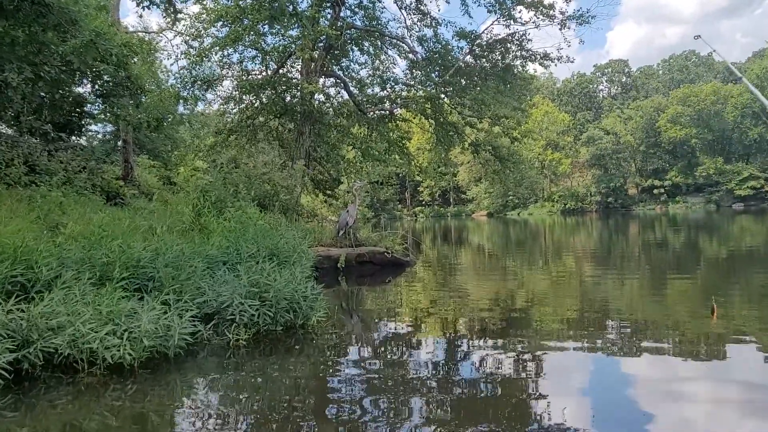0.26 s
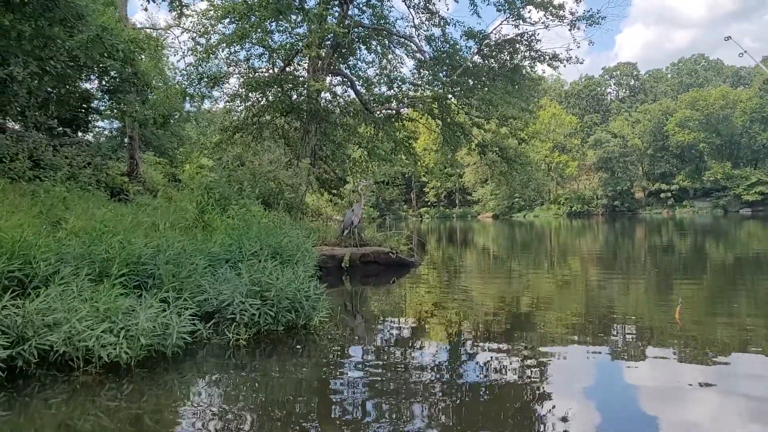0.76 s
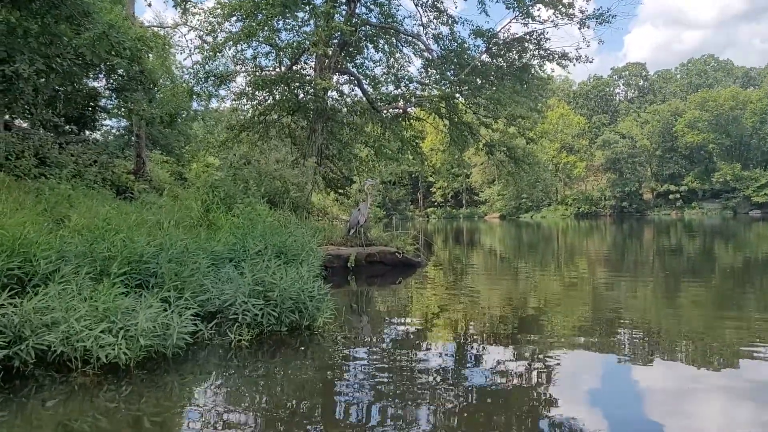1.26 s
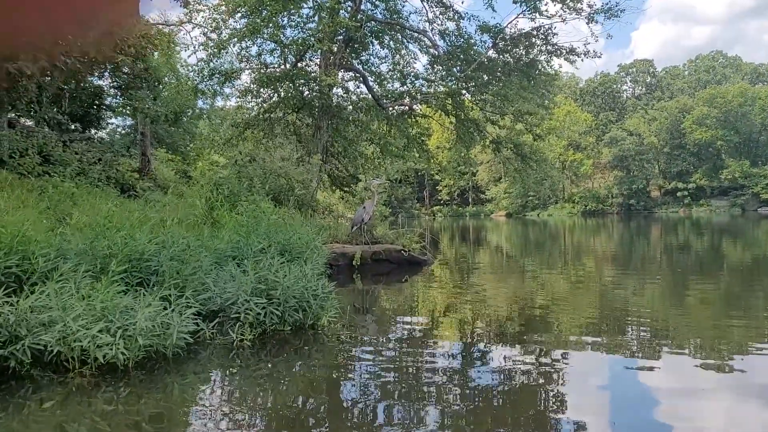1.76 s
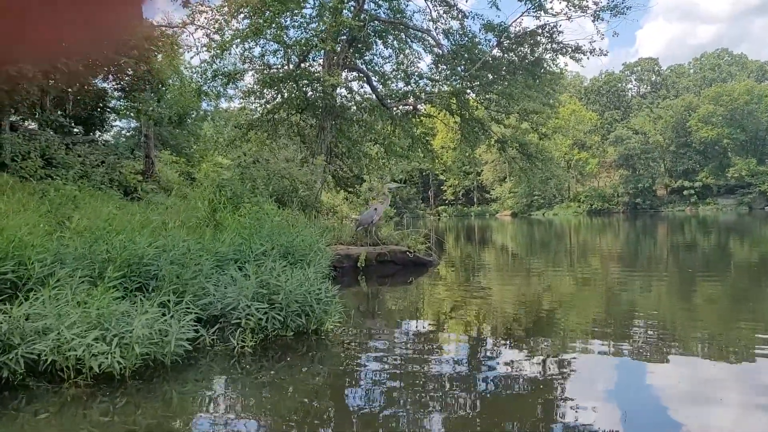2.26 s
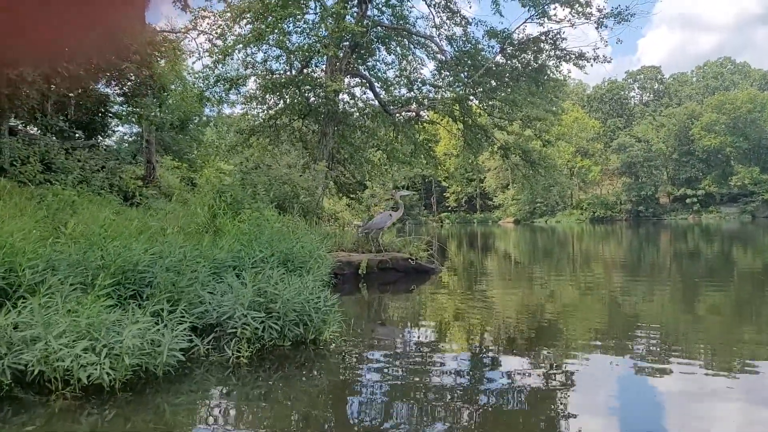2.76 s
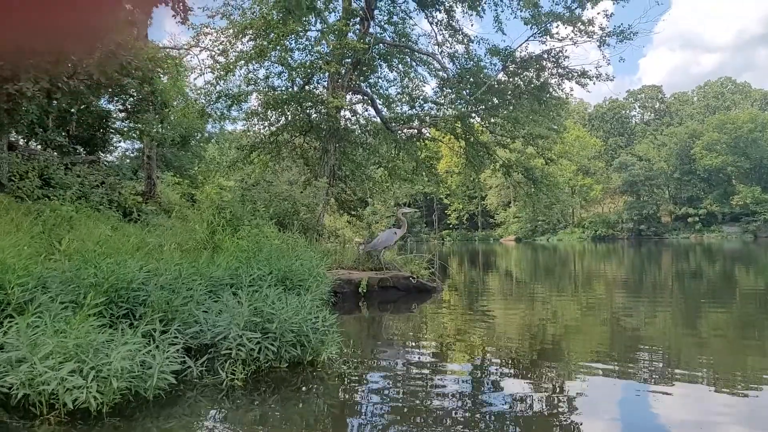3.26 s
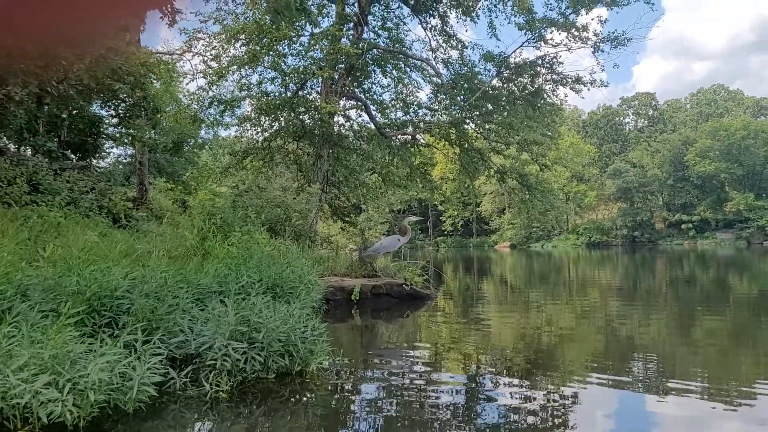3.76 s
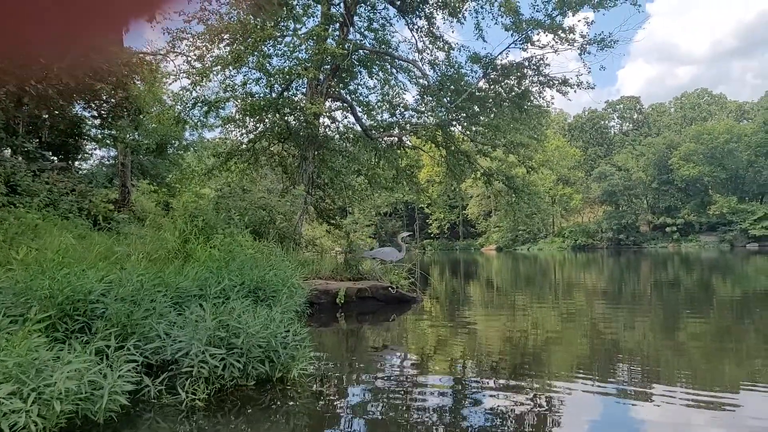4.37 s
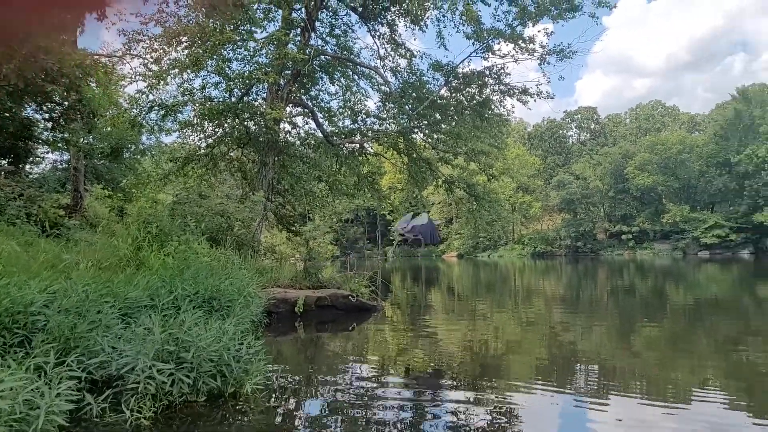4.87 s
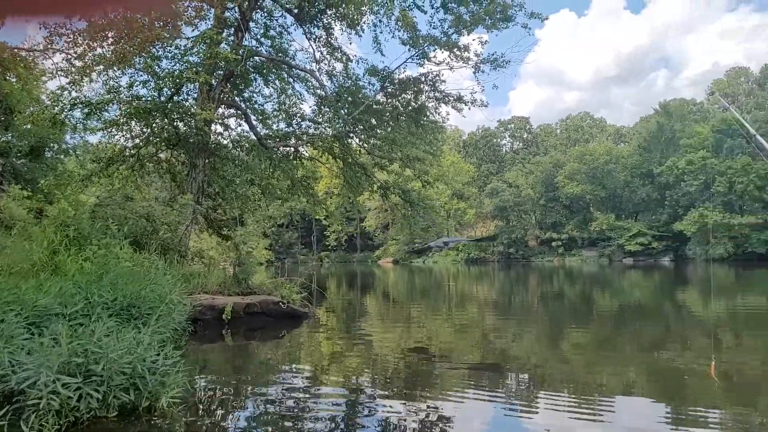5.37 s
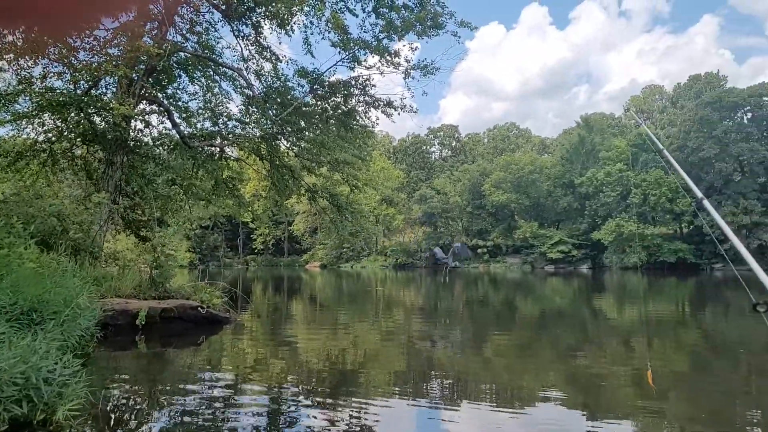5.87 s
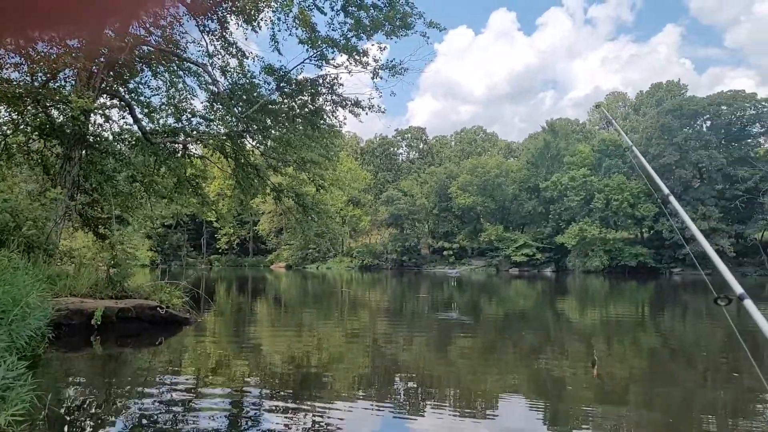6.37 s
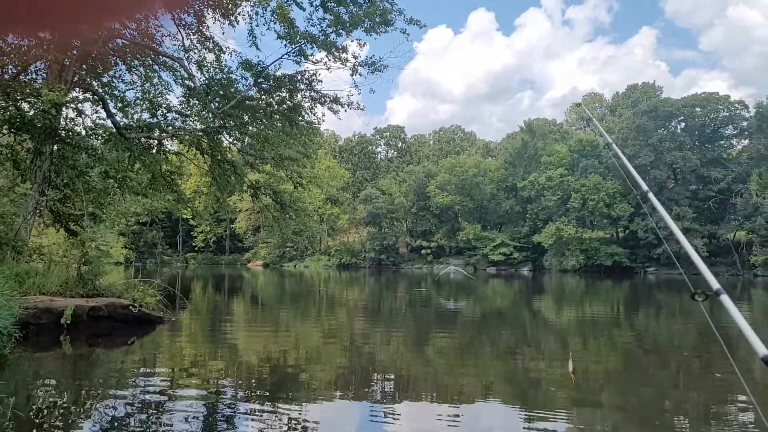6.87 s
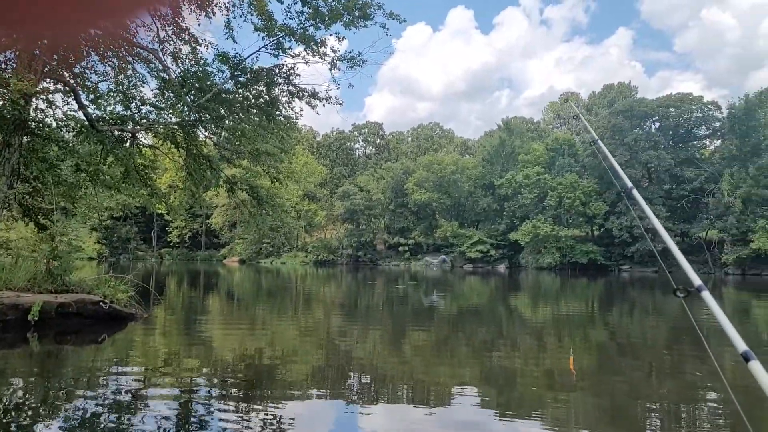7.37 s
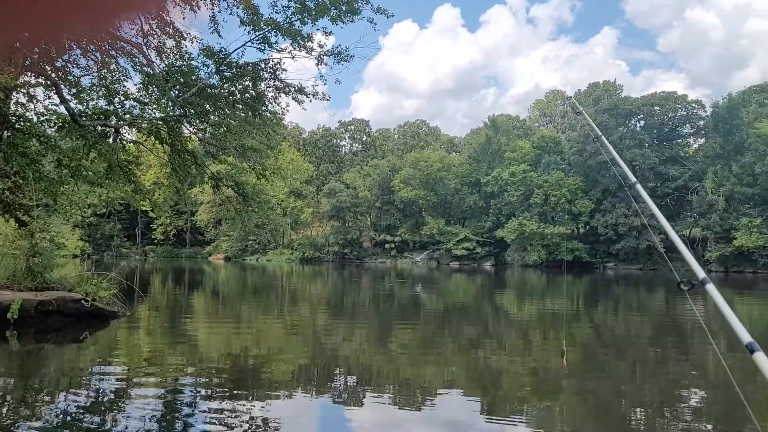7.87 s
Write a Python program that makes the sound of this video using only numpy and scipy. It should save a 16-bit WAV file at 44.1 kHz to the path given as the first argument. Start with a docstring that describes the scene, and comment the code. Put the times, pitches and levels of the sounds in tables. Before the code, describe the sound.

Summer lakeside: cicada buzz, faint bird chirps and small fishing-tackle ticks, low distant traffic, then a startled heron's rough croaks, the first one longest.

```python
"""A near cicada sings in syllables, then settles into a steady buzz over a far insect chorus.
A heron on the wooded summer lake shore gives five harsh, rattling croaks; bank and trees answer them.
A small bird chirps, fishing tackle ticks near the microphone, and traffic and engines rumble far off.
Tymbal clicks ring the cicada's abdomen, and slaps of the syrinx ring the heron's throat, bill and chest.
Chirps are gliding tones, ticks are short noise bursts, the distance is shaped noise and wavering tones."""
import sys
import numpy as np
from scipy import signal
from scipy.fft import rfft, irfft, next_fast_len
from scipy.io import wavfile
from scipy.ndimage import uniform_filter1d, map_coordinates

SR = 44100
rng = np.random.default_rng(int(sys.argv[2]) if len(sys.argv) > 2 else 0)


def inscribe(sig):
    """Save sig as 16-bit PCM at rate SR to the path in sys.argv[1].

    A 1-D sig is mono; a 2-D sig holds one channel per row.
    Samples are clipped to [-1, 1] before scaling.
    """
    pcm = np.round(np.clip(np.atleast_2d(sig).T, -1, 1) * 32767)
    wavfile.write(sys.argv[1], SR, pcm.astype(np.int16))


N = 358091

# The heron's croaks, the first a mere tick of voice; levels are before the resonances: start_s, length_s,
# level_db, crest (share of length), swell_db, slaps_per_s at rest, slaps_per_s at the crest, second_slap (0-1),
# chest_hz, rasp_db, chest_db
HERON_CROAKS = [(4.91, 0.019, -43, .5, 1.5, 92, 58, 0.25, 451, -16, -2),
                (5.08, 0.57, -28.8, .64, 6, 67, 75, 0.22, 505, -12.5, -17.5),
                (5.832, .18, -37.5, 0.63, 2.5, 47, 61.5, 0.55, 440, -19.5, -11.5),
                (6.188, .19, -38.5, 0.6, 5.5, 46, 86, 0.56, 421, -15.5, -11),
                (6.905, .36, -34.7, .38, 8, 55, 62, 0.37, 483, -10.5, -15),
                (7.832, .21, -30, 0.85, 14.5, 57, 90, 0.21, 480, -15.5, -30)]


def amp(db):
    """Decibels to amplitude."""
    return 10 ** (np.asarray(db) / 20)


def unit(x):
    """x at rms 1."""
    return x / np.sqrt(np.mean(x ** 2) + 1e-20)


def along(points, hz):
    """(Hz, value) points read on a log frequency axis."""
    f, v = np.transpose(points)
    return np.interp(np.log(hz + 1), np.log(f + 1), v)


def curves(rows):
    """One value per sample for each column after the time."""
    s, *cols = np.transpose(rows)
    return [np.interp(np.arange(N) / SR, s, c) for c in cols]


def wobble(rate):
    """A smooth random curve, rate knots a second."""
    coarse = np.linspace(0, N, N // 16)
    knots = rng.standard_normal(int(N * rate / SR) + 4)
    return np.interp(np.arange(N), coarse, map_coordinates(knots, [coarse * rate / SR]))


def gate(s, length, attack, release):
    """1 for length seconds from s, with a ramp before and after."""
    return np.interp(np.arange(N) / SR, [s - attack, s, s + length, s + length + release], [0, 1, 1, 0])


def filtered(x, response):
    """x times a response of frequency."""
    m = next_fast_len(N + SR // 2)
    return irfft(rfft(x, m) * response(np.fft.rfftfreq(m, 1 / SR)), m)[..., :N]


def resonate(x, hz, width_hz, order=2):
    """A resonance of cascaded stages, each width_hz wide, whose centre may move; flat noise keeps its power."""
    turn = np.exp(2j * np.pi * np.cumsum(hz * np.ones(N)) / SR)
    pole = np.exp(-np.pi * width_hz / SR)
    ring = x / turn  # the centre shifted down to 0 Hz
    for stage in range(order):
        ring = signal.lfilter([1 - pole], [1, -pole], ring)
    kept = (1 - pole) * np.prod([1 - .5 / k for k in range(1, order)]) / 4
    return (ring * turn).real / np.sqrt(kept)


def pulses(rate, jitter, scatter_db):
    """Times (samples) and sizes of pulses at a changing rate; jitter is a share of the cycle."""
    cycles = np.cumsum(rate) / SR
    count = np.arange(int(cycles[-1]) + 1)
    chance = rng.standard_normal((N // 64, 2))[:len(count)]
    at = np.interp(count + jitter * chance[:, 0], cycles, np.arange(len(rate)))
    return at, amp(scatter_db * chance[:, 1])


def train(at, size):
    """Impulses placed between samples by a windowed sinc."""
    taps = at.astype(int)[:, None] + np.arange(-7, 9)
    off = taps - at[:, None]
    shape = np.sinc(off) * np.cos(np.pi * off / 16) ** 2
    return np.bincount(np.clip(taps, 0, N - 1).ravel(), (size[:, None] * shape).ravel(), N)


def puffs(clicks, life):
    """A burst of noise after each click, its energy set by the click, dying in life seconds."""
    pole = np.exp(-2 / (life * SR))
    energy = signal.lfilter([1 - pole], [1, -pole], clicks ** 2)
    return np.sqrt(energy) * rng.standard_normal(N)


def place(x, pan_db):
    """Left louder than right by pan_db."""
    return x * amp(np.reshape([pan_db / 2, -pan_db / 2], (2, -1)))


def add(track, s, sound):
    """Mix a sound in from time s."""
    part = track[..., round(s * SR):][..., :sound.shape[-1]]
    part += sound[..., :part.shape[-1]]


def rush(spectrum, patchy_db):
    """Stereo noise of rms 1 with patches of random gain."""
    # Likeness of left and right: freq_hz, likeness (0-1)
    likeness = [(30, 0.75), (120, 1), (300, 0.28), (1000, 0), (4000, 0), (15000, 0)]
    z = signal.stft(rng.standard_normal((2, N)), nperseg=512)[2]
    field = uniform_filter1d(rng.standard_normal(z.shape[1:]), size=6, axis=0)
    field = uniform_filter1d(field, size=14, axis=1)
    pair = signal.istft(z * amp(patchy_db * unit(field)), nperseg=512)[1][:, :N]
    turn = lambda hz: np.arccos(np.clip(along(likeness, hz), -1, 1)) / 2
    mid, side = filtered(pair, lambda hz: amp(along(spectrum, hz)) * [np.cos(turn(hz)), np.sin(turn(hz))])
    return unit(np.array([mid + side, mid - side]))


def cicada(stagger=0.03, rib_life=0.0047, rough_early=0.7, rough_settled=0.8, loose_life=0.0019,
           leaves_db=-2, ear_lag=0.000347, direct=0.39):
    """Two tymbals buckle in turn; each buckling is a quick run of rib clicks that rings the abdomen."""
    # Relative resonance of the abdomen when clicking fast: freq_hz, level_db
    fast_body = [(2500, -52), (3400, -23.5), (4000, -8), (4700, -16), (5050, -7), (5400, -33), (5900, -18),
                 (7200, -34), (8400, -14), (9500, -7), (10600, -15), (11600, -8.5), (12700, 3.5),
                 (13600, 1), (14400, -10), (15000, -13), (15700, -19)]
    # Relative resonance of the abdomen in the steady buzz: freq_hz, level_db
    settled_body = [(2500, -38.5), (3400, -30.5), (4000, -19.5), (4600, -12), (4950, -22), (5300, -24),
                    (5900, -32), (7200, -30.5), (8400, -11.5), (9200, -11.5), (10400, -25.5), (11300, -11),
                    (12400, -0.5), (13100, -1.5), (14100, -16), (15700, -14.5)]
    # Place in the stereo picture: time_s, left_over_right_db
    pan_track = [(0.0, 0.5), (0.16, 1.5), (1.79, 1), (2.03, 6.5), (8.12, 8)]
    level_db, rate, lift_hz, settled = song_controls()
    pan_db, = curves(pan_track)
    taut = np.clip((rate - 305) / 30, 0, 1)  # faster clicking shifts the abdomen towards its fast resonances
    rate = rate * (1 + 0.001015 * wobble(9))
    at, size = pulses(rate, jitter=0.0021, scatter_db=1)
    at[::2] += stagger * SR / rate.mean()  # uneven turns give lines at half the click rate
    sides = [train(at[k::2], size[k::2]) for k in range(2)]

    # three paths: the direct one, and one through the foliage to each ear
    t = np.arange(SR // 100) / SR
    ribs = lambda: rng.standard_normal((3, len(t))) * np.exp(-t / rib_life)
    clean = unit(sum(signal.fftconvolve(side[None], ribs(), axes=1)[:, :N] for side in sides))
    loose = np.array([unit(puffs(sum(sides), loose_life)) for path in range(3)])
    loose = unit(loose + amp(leaves_db) * rng.standard_normal((3, N)))  # leaves scatter sound into the gaps
    # the loose part is slightly weaker around 9 kHz
    loose = filtered(loose, lambda hz: amp(along([(5500, -1.0), (9000, -1.8), (12000, -0.38)], hz)))
    rough = np.clip(rough_early + (rough_settled - rough_early) * settled, 0, 1)
    paths = np.sqrt(1 - rough) * clean + np.sqrt(rough) * loose
    lagged = filtered(paths[0], lambda hz: np.exp(-2j * np.pi * hz * ear_lag))
    straight = np.array([paths[0], lagged])
    drive = unit(direct * straight + (1 - direct) * paths[1:])

    song = taut * abdomen(drive, fast_body, lift_hz) + (1 - taut) * abdomen(drive, settled_body, lift_hz)
    song = song + partials(rate, settled)
    return place(amp(level_db + 1.53) * song, pan_db)


def song_controls():
    """Each syllable tenses the tymbal muscles: louder, faster and higher; the rate sinks as the song settles."""
    # Syllables, the last three being the steady buzz; level before the final trim:
    # start_s, length_s, level_db, resonance_lift_hz
    syllables = [(0.129, 0.11, -34, 250), (0.511, 0.27, -34, 246), (.91, .2, -33, 200),
                 (1.14, .25, -32.5, 152), (1.509, .06, -30.5, 50), (1.741, 0.23, -33, 0),
                 (2.137, .26, -35.5, 150), (2.579, .1, -36, -50), (2.741, .05, -36, 350),
                 (2.966, .03, -34, -300), (3.086, 0.071, -34, 200), (3.29, .065, -32, 100),
                 (3.497, .03, -32.5, 100), (3.62, .12, -31.5, 200), (3.854, .025, -34.5, 0),
                 (3.991, .14, -30.5, 250), (4.254, .025, -33, 100), (4.395, 0.22, -31.5, 200),
                 (4.748, 0.028, -33, 100), (4.972, 1.78, -31, 52), (6.18, .17, -29.5, 50),
                 (6.838, 1.28, -32, -2)]
    # Click rate under full effort, slowing as the song settles: time_s, clicks_per_s
    click_rate = [(.1, 340), (.5, 333), (.9, 330), (1.5, 327), (2.3, 325), (3, 317), (3.6, 316),
                  (3.75, 308), (4, 312), (4.12, 305), (4.38, 310), (4.47, 305), (4.95, 306.5), (5.12, 302),
                  (5.4, 304.5), (5.55, 301.5), (6.3, 306.4), (6.75, 306.6), (7.15, 305.2), (7.35, 307.2),
                  (7.9, 305.2), (8.12, 306)]
    attack_s, release_s = .055, .1  # muscles tense before a syllable and slacken after it
    idle_db = -42  # the buzz that goes on between syllables, before the final trim
    slack_clicks_per_s, slack_drop_hz = 8, 200  # click rate and resonance lost when slack
    settle_s, unsteady_db, drift_hz = 4.97, .9, 130  # time to settle; random spread of level and resonance
    gates = np.array([gate(row[0], row[1], attack_s, release_s) for row in syllables])
    s, length, db, lift_hz = np.transpose(syllables)
    effort = gates.max(axis=0)
    progress = np.clip(np.arange(N) / SR / settle_s, 0, 1)
    level_db = idle_db + np.max(gates * (db - idle_db)[:, None], axis=0)
    level_db = level_db + unsteady_db * (1 - progress / 2) * wobble(14)
    lift_hz = lift_hz @ gates - slack_drop_hz * (1 - effort) + drift_hz * wobble(12)
    rate = curves(click_rate)[0] - slack_clicks_per_s * (1 - effort)
    return level_db, rate, lift_hz, progress ** 2


def abdomen(drive, spectrum, lift_hz):
    """The cicada's resonances, all stretched in pitch as the main one is lifted."""
    main_hz = 12700
    hz, t, z = signal.stft(drive, SR, nperseg=512)
    stretch = 1 + np.interp(t * SR, np.arange(N), lift_hz) / main_hz
    ringing = z * amp(along(spectrum, hz[:, None] / stretch))
    return unit(signal.istft(ringing, SR, nperseg=512)[1][:, :N])


def partials(rate, settled):
    """Tones at multiples of one tymbal's rate; the high ones grow in as the song settles."""
    # Turn-taking of the tymbals, from even (0) to limping (1): time_s, limp_share
    limp_track = [(.7, 0.015), (.85, 0.86), (6.78, 0.99), (6.86, 0)]
    # Relative resonance over the low partials: freq_hz, level_db
    low_body = [(3600, -42), (3990, -27), (4140, -29), (4440, -21.5), (4600, -22.5), (4750, -18),
                (4900, -30), (5050, -34), (5210, -26.5), (5330, -30), (5500, -41), (5650, -34), (5900, -46)]
    # High partials, relative level: multiple of one tymbal's rate, limping_db, even_turns_db
    high_partials = [(54, -28, -34), (55, -38, -25), (56, -28, -29), (58, -26, -29), (60, -22, -31),
                     (75, -27, -19), (77, -18, -20), (78, -21, -13), (79, -20, -24), (81, -8, -13),
                     (82, -22, -14), (83, -13, -24), (84, -20, -13), (86, -20, -21), (87, -21, -20),
                     (94, -23, -31)]
    weak_partial_db = -12.5  # limping favours odd multiples, even turns favour even ones
    flutter, blur_per_partial = .006, .009  # phase spread per multiple (radians): tymbals, moving leaves
    ear_wander = .6  # slow phase spread at each ear, opposite ways (radians)
    shimmer_db = 2.8  # slow drift of each partial
    early_ring_db = -7  # the low partials are weaker before the song settles
    limp = np.clip(curves(limp_track)[0], 0, 1)
    phase = np.pi * np.cumsum(rate) / SR  # one tymbal clicks at half the rate

    def tone(k, db):
        """One partial with unsteady level and phase."""
        blur = k * (flutter * wobble(25) + blur_per_partial * wobble(110))
        ears = ear_wander * wobble(4) * np.array([[1], [-1]])
        return amp(db + shimmer_db * wobble(5)) * np.sqrt(2) * np.sin(k * phase + blur + ears)

    weak = lambda k: 1 - limp if k % 2 else limp
    low = sum(tone(k, along(low_body, k * rate / 2) + weak_partial_db * weak(k)) for k in range(26, 38))
    high = sum(tone(k, even + (limping - even) * limp) for k, limping, even in high_partials)
    return amp(1 + early_ring_db * (1 - settled ** 2)) * low + settled ** 6 * high


def cicada_whine():
    """A narrow, high whine of the near cicada, as ringing noise, swells and fades early on."""
    # The whine: time_s, level_db
    whine_level = [(0, -62), (.15, -50), (.4, -62), (1.0, -46), (1.5, -55), (2.25, -50), (2.7, -64),
                   (3.2, -90)]
    return amp(curves(whine_level)[0]) * resonate(rng.standard_normal((2, N)), 4755, 46)


def heron(puff_life=0.012, rasp_life=0.0087, throat_width_hz=380, skirt_width_hz=900, skirt_db=2,
          rasp_slap_db=-4):
    """Slow slaps of the syrinx ring throat, bill and chest; pushed hard they break up into a rasp."""
    # Bill, then lower and upper rasp resonance: centre_hz, width_hz of each stage
    bill_and_rasps = [(1560, 200), (2200, 820), (2830, 580)]
    # The throat resonance moves and the bill rings as it opens: time_s, throat_hz, bill_db
    throat_track = [(4.93, 680, -18), (5.08, 773, -27), (5.36, 820, -31), (5.46, 852, -25),
                    (5.52, 890, -15), (5.64, 890, -16), (5.85, 830, -21), (5.98, 870, -16.5),
                    (6.2, 820, -22), (6.35, 860, -23), (6.92, 806, -11.5), (7.1, 848, -12),
                    (7.25, 808, -14.5), (7.85, 818, -16), (7.915, 896, -16), (7.943, 1078, -5),
                    (7.975, 1220, -4.5), (8.008, 1230, -4), (8.024, 890, -8), (8.04, 735, -5)]
    clean_air = .07  # share of air in a clean slap
    chest_width_hz = 210
    rasp_floor_db = -14  # the upper rasp is all but shut in a soft croak
    sounding, level_db, chest_hz, rasp_db, chest_db, rate, rough = croak_controls()
    throat_hz, bill_db = curves(throat_track)
    slaps = syrinx(rate)

    def air(life):
        """Puffs after the slaps, giving way to a steady rush when hoarse."""
        return np.sqrt(1 - rough) * puffs(slaps, life) + np.sqrt(rough) * sounding * rng.standard_normal(N)

    share = clean_air + (1 - clean_air) * rough
    drive = np.sqrt(1 - share) * slaps + np.sqrt(share) * air(puff_life)
    bill, low_rasp, high_rasp = bill_and_rasps
    # an open bill widens the throat resonance
    skirt = amp(np.minimum(bill_db + skirt_db, -10)) * resonate(air(puff_life), throat_hz, skirt_width_hz)
    throat = resonate(drive, throat_hz, throat_width_hz, order=4) + skirt
    throat_tone = [(400, -6.5), (620, -9), (720, 0.0), (1000, -1.5), (1650, 1), (1900, 0)]
    throat = filtered(throat, lambda hz: amp(along(throat_tone, hz)))
    beak = amp(bill_db) * resonate(drive, *bill, order=3)
    boom = amp(chest_db) * resonate(drive, chest_hz, chest_width_hz)

    # the rasp brightens as it grows louder
    bright_db = np.clip(0.9 * (level_db + rasp_db + 41), rasp_floor_db, 0)
    scratch = lambda: air(rasp_life) + amp(rasp_slap_db) * np.sqrt(1 - rough) * slaps
    rasp = resonate(scratch(), *low_rasp) + amp(bright_db) * resonate(scratch(), *high_rasp)
    rasp_tone = [(1350, -11), (1750, 0.5), (2400, 1.5), (3100, 2.5), (3700, 3)]
    rasp = filtered(rasp, lambda hz: amp(along(rasp_tone, hz)))
    return amp(level_db) * (place(throat + beak + boom, 3.5) + place(amp(rasp_db - 0.7) * rasp, -.3))


def croak_controls():
    """Effort rises to a crest and falls in each croak, making it louder and faster."""
    # The first three full croaks crack when pushed: time_s, hoarseness (0-1)
    cracks = [(5.08, 0.4), (5.14, 0.43), (5.2, 0.76), (5.28, 0.97), (5.335, 0.68), (5.39, 0.28),
              (5.46, 0.25), (5.52, 0.3), (5.585, 0.55), (5.62, 0.2), (5.92, .1), (5.945, 0.4), (5.97, .1),
              (6.25, 0.09), (6.29, .5), (6.34, 0.3), (6.38, 0)]
    edge_s = .005  # onset and cut-off of a croak's air
    onset_s, onset_db = 0.027, 5  # a croak takes a moment to catch, and starts this much weaker
    fade = 2.2  # effort lost per croak length after the crest
    loss_db, crack_rasp_db, crack_chest_db = 5.5, 15, 17  # hoarseness costs voice, adds rasp and chest
    rasp_sag_db = 4  # rasp lost at no effort
    clean_rough = .03  # roughness of an unbroken croak (0-1)
    t = np.arange(N) / SR
    starts = np.array(HERON_CROAKS)[:, 0]
    latest = np.maximum(np.searchsorted(starts - edge_s, t) - 1, 0)
    rows = np.array(HERON_CROAKS)[latest].T
    s, length, db, crest, swell_db, slow, fast, second_slap, chest_hz, rasp_db, chest_db = rows
    u, crest = (t - s) / length, np.clip(crest, .05, .95)
    effort = np.clip(np.minimum(u / crest, 1 - fade * (u - crest)), 0, 1)
    sounding = sum(gate(row[0], row[1], edge_s, edge_s) for row in HERON_CROAKS)
    hoarse = np.clip(np.interp(t, *np.transpose(cracks), left=0, right=0), 0, 1)
    catching = np.clip(1 - (t - s) / onset_s, 0, 1)
    level_db = db - swell_db * (1 - effort) - onset_db * catching - loss_db * hoarse
    rasp_db = rasp_db + crack_rasp_db * hoarse ** 2 - rasp_sag_db * (1 - effort) ** 2
    chest_db = chest_db + crack_chest_db * hoarse
    rate = slow + (fast - slow) * effort
    rough = clean_rough + (1 - clean_rough) * hoarse ** 2
    return sounding, level_db, chest_hz, rasp_db, chest_db, rate, rough


def syrinx(rate):
    """A nearly even run of slaps from the start of each croak, each followed by a weaker second slap."""
    second_delay_s = 0.00478  # mean delay of the second slap
    slaps = np.zeros(N)
    for s, length, db, crest, swell_db, slow, fast, second_slap, *colour in HERON_CROAKS:
        start = round(s * SR)
        at, size = pulses(rate[start:start + round(length * SR)], jitter=.05, scatter_db=1.7)
        late = second_delay_s * SR * rng.uniform(.75, 1.25, size=128)[:len(at)]
        pair = train(start + at, size) + train(start + at + late, second_slap * size)
        slaps += pair / np.hypot(1, second_slap)
    return slaps * np.sqrt(SR / rate)  # equal power at any rate


def small_bird():
    """Short gliding notes with a rough burr."""
    # Notes, level before trims: start_s, length_s, start_hz, end_hz, level_db
    notes = [(1.377, 0.064, 1940, 2420, -69), (2.427, 0.074, 2003, 2320, -63),
             (3.252, 0.023, 2160, 1810, -53), (3.463, 0.026, 2650, 2790, -58),
             (3.555, 0.052, 2680, 3080, -51.5), (3.855, .03, 2740, 2904, -60),
             (4.169, 0.034, 2777, 2940, -50), (4.629, 0.042, 2830, 2935, -54.5),
             (4.722, 0.058, 2600, 3060, -51.5), (5.792, 0.035, 2880, 2995, -55.5),
             (6.125, 0.042, 2150, 2643, -60), (6.53, .045, 3160, 2950, -61),
             (6.765, 0.049, 3107, 2820, -58), (6.813, 0.067, 2028, 2652, -59),
             (7.261, 0.051, 2100, 2440, -58), (7.779, 0.041, 2270, 2420, -51)]
    burr_share, flutter_db = .024, 3.5  # random spread of pitch (share) and level
    out, burr, flutter = np.zeros(N), wobble(420), wobble(260)
    for s, length, start_hz, end_hz, db in notes:
        u = np.linspace(0, 1, int(length * SR))
        glide_hz = start_hz + (end_hz - start_hz) * u
        hz = glide_hz * (1 + burr_share * burr[round(s * SR):][:len(u)])
        add(out, s, amp(db + 6.5) * np.sin(np.pi * u) * np.sin(2 * np.pi * np.cumsum(hz) / SR))
    return place(out * amp(flutter_db * flutter), 2.2)


def tackle(life=0.0085, snap_life=0.0014):
    """Each tick is a brief scrape with a ring, knock and snap; the one at 2.913 s is nearly all broadband snap."""
    # Ticks (at 2.913 s a bare snap, not tackle), level before trims, knock and snap relative to it:
    # start_s, level_db, low_knock_db, bright_snap_db
    ticks = [(0.099, -35, -19, -13), (0.146, -44.5, -2, -16), (1.8215, -38.5, -1.5, -15),
             (1.848, -40.5, -6, -9), (2.487, -39, -5, -11), (2.5195, -25.5, -33, -24),
             (2.592, -29, -10, -22), (2.913, -42, -20, 6.5), (3.2797, -28, -18, -10),
             (3.301, -28.5, -19, -13), (3.315, -32, -26, -6), (3.961, -28.5, -36, -11),
             (4.0042, -26, -18, -22), (4.0485, -28, -13, -22), (4.0593, -24, -13, -19),
             (4.0746, -27, -25, -29), (4.142, -37.5, -3, -8), (4.1582, -32, -12, -20), (4.318, -48, 1, -3),
             (6.2037, -30, -11, -8), (7.7365, -32, -11, -14), (7.76, -30, -3.5, -9), (7.9127, -37, 3, -24)]
    # Resonances of the ring: centre_hz, width_hz of each stage, level_db
    ring_modes = [(1290, 280, -14.5), (1740, 230, -14), (2720, 470, -0.5), (3230, 290, 1)]
    rub, knock, snap = np.zeros((3, N))
    t = np.arange(SR // 10) / SR
    scrape = lambda life: rng.standard_normal(len(t)) * np.exp(-t / life)
    for s, db, knock_db, snap_db in ticks:
        add(rub, s, amp(db - 17.0) * scrape(life))
        add(knock, s, amp(db + knock_db - 2.5) * scrape(life))
        add(snap, s, amp(db + snap_db + 4.5) * scrape(snap_life))
    ring = sum(amp(db) * resonate(rub, hz, width) for hz, width, db in ring_modes)
    knock_tone = [(150, -17), (400, -2.5), (1500, 4.5), (3500, -1), (6000, -24)]
    snap_tone = [(1000, -16), (3000, -1.0), (8000, 4.0), (15000, 2)]
    low = filtered(knock, lambda hz: amp(along(knock_tone, hz)))
    high = filtered(snap, lambda hz: amp(along(snap_tone, hz)))
    return place(ring + low + high, 5.0)


def shore(x, decay):
    """A diffuse answer, different at each ear, each frequency dying at its own rate."""
    hz, t, z = signal.stft(rng.standard_normal((2, SR)), SR, nperseg=256)
    dying = z * amp(-60 * t / along(decay, hz)[:, None])
    tail = signal.istft(dying, SR, nperseg=256)[1]
    return signal.fftconvolve(x, tail / np.linalg.norm(tail[0]), axes=1)[:, :N]


def background():
    """Far insects in the trees, and a road, engines and machinery beyond: shaped noise and wavering tones."""
    # Relative spectrum of the insect chorus: freq_hz, level_db
    chorus_spectrum = [(2200, -33.5), (3000, -15.5), (3600, -2.5), (4100, 4), (4700, 1.5), (5100, -4),
                       (5700, -17), (7200, -11), (8300, -2), (10500, -2), (12500, -0.5), (14500, -13),
                       (15700, -15.5)]
    # Far insects, before the trim: time_s, level_db
    chorus_level = [(0, -45), (1.0, -48), (1.7, -45.5), (2.1, -50), (2.5, -48.5), (3.6, -47.5),
                    (4.3, -44.5), (5.3, -48), (6.5, -48.5), (7.2, -45.5), (8.12, -45.5)]
    # A farther insect joins in: time_s, level_db
    neighbour_level = [(0, -66), (2.85, -59), (3.0, -52), (3.6, -45), (4.6, -46.5), (5.1, -61),
                       (8.12, -45.5)]
    # Relative spectrum of the road: freq_hz, level_db
    road_spectrum = [(13, -40), (25, -16), (48, -0.5), (100, -1), (214, -11.5), (242, -14.5), (301, -11.5),
                     (346, -16.5), (423, -12.5), (458, -21), (769, -25), (885, -29.5), (1550, -34),
                     (2400, -37), (2600, -41), (3380, -39), (5720, -120)]
    # Far machinery, before the trim: freq_hz, level_db
    hums = [(212, -61), (428, -73)]
    # A far engine: time_s, pitch_hz, level_db
    engine_track = [(0, 126.8, -52.5), (.4, 125.1, -52), (1.3, 115, -53), (2.8, 121.9, -50.5),
                    (3.5, 124, -59), (4.6, 128, -60), (5.8, 135.1, -54.5), (6.8, 148, -52),
                    (7.4, 150.1, -53), (8.12, 131, -54)]
    # Its orders: multiple of the pitch, relative level_db
    engine_orders = [(1, 0.5), (1.5, -8.5), (2, -15)]
    # A second, deeper engine: time_s, pitch_hz, level_db
    drone_track = [(0, 97, -57), (1.4, 84.9, -58), (3, 89, -59), (4.4, 92.95, -53.5), (5.4, 96.95, -52),
                   (6, 96.9, -55.5), (7.25, 97.93, -47), (7.5, 97.9, -62)]
    chorus_db, = curves(chorus_level)
    traffic_db = -48.5 + 0.72 * np.arange(N) / SR  # the road grows slowly louder
    chorus = amp(chorus_db + 4.8 + 0.4 * wobble(12)) * rush(chorus_spectrum, patchy_db=1.5)
    neighbour = amp(curves(neighbour_level)[0]) * resonate(rng.standard_normal((2, N)), 8610, 770)
    road = amp(traffic_db - 2.5) * rush(road_spectrum, patchy_db=2.0)
    hum = sum(amp(db - 1) * resonate(rng.standard_normal(N), hz, 6.9) for hz, db in hums)
    insects = place(chorus, 0.78) + place(neighbour, 6.2)
    return insects + road + engine(engine_track, engine_orders) + engine(drone_track, [(1, 0)]) + hum


def engine(rows, orders):
    """A far engine's orders, multiples of one moving pitch, each fading in and out on its way."""
    hz, db = curves(rows)
    phase = 2 * np.pi * np.cumsum(hz) / SR
    order = lambda k, order_db: amp(db + order_db + 2.8 * wobble(4)) * np.sin(k * phase + .5 * wobble(7))
    return sum(order(k, order_db) for k, order_db in orders)


def scene():
    """Birds and tackle with their echoes, amid the insects."""
    # Echo of the water and near bank: freq_hz, t60_s
    bank_decay = [(200, .02), (1000, 0.18), (14000, 0.0085)]
    # Answer from the trees: freq_hz, t60_s
    trees_decay = [(200, 0.27), (1000, 0.68), (4000, 0.25), (14000, 0.05)]
    heron_lag_s = 0.0001  # the croaks reach the right ear first
    chirps = small_bird()
    croaks = filtered(heron(), lambda hz: np.exp(-2j * np.pi * hz * [[heron_lag_s], [0]]))
    calls = croaks + amp(-2.0) * chirps + amp(0.5) * tackle()
    near = amp(-14) * shore(calls, bank_decay)
    far = shore(amp(-27) * calls + amp(-11.5) * chirps, trees_decay)  # extra answer for the chirps
    return calls + near + far + cicada() + cicada_whine() + background()


def record(dry):
    """The recorder keeps nothing above its band limit."""
    top_hz = 15780
    return filtered(dry, lambda hz: hz < top_hz)


dry = scene()
out = record(dry)
inscribe(out)
```